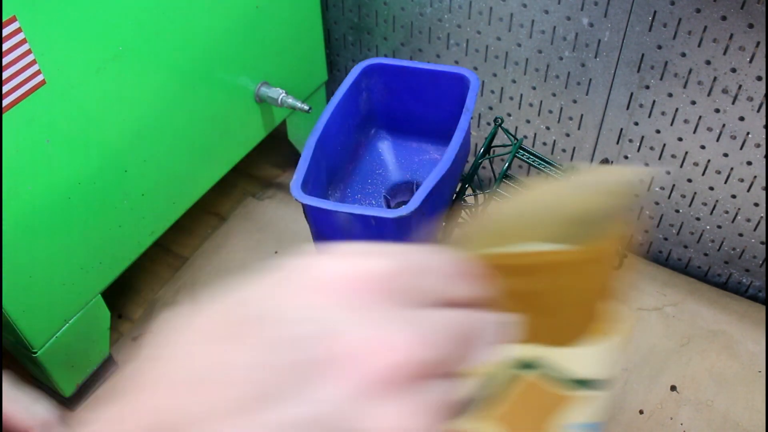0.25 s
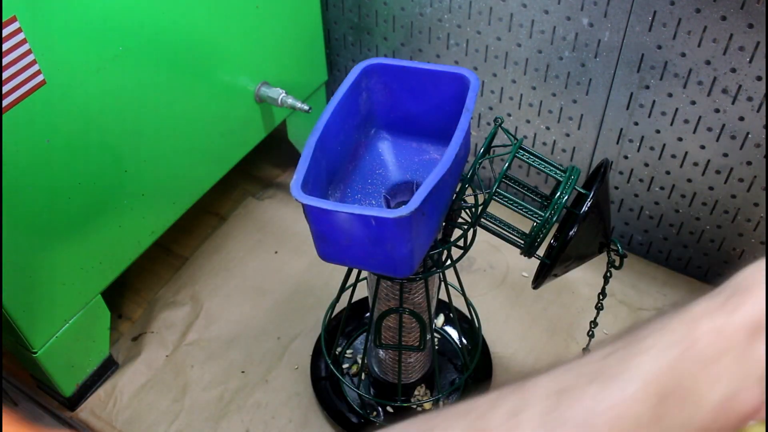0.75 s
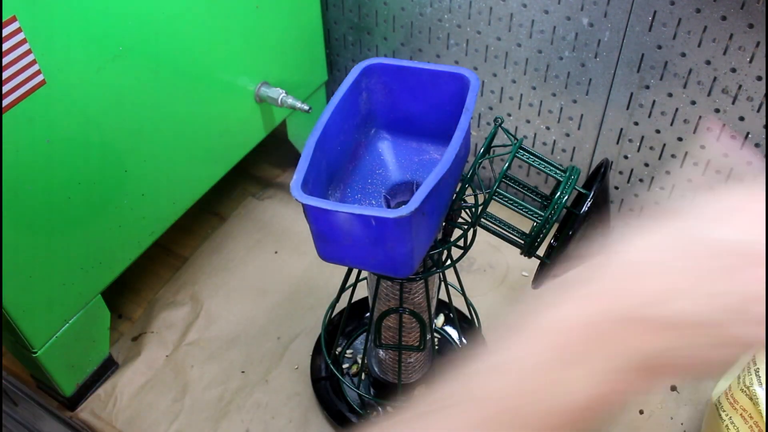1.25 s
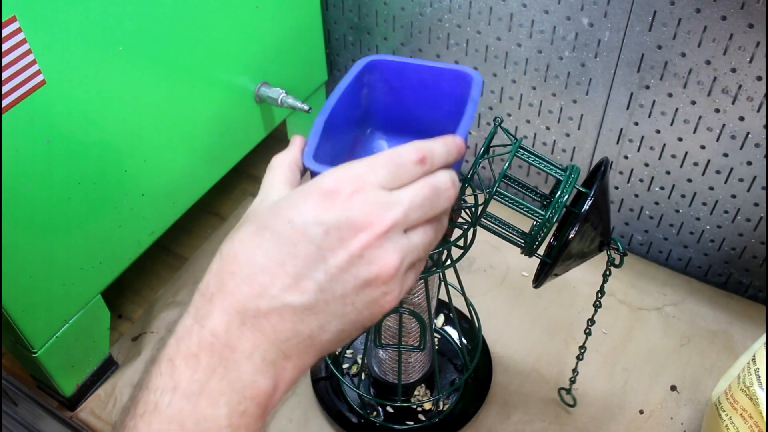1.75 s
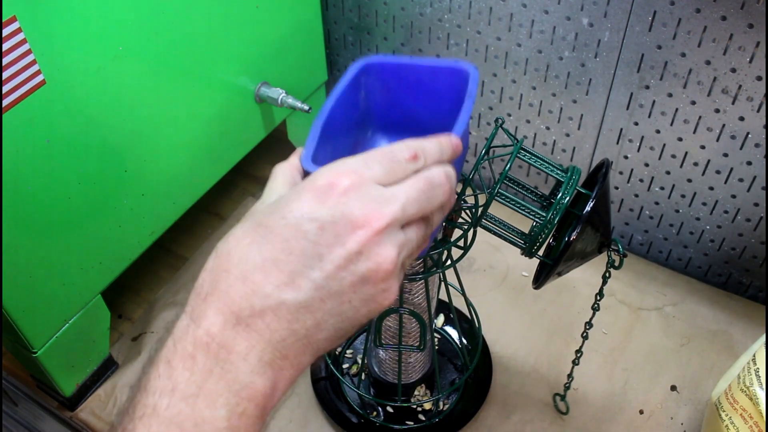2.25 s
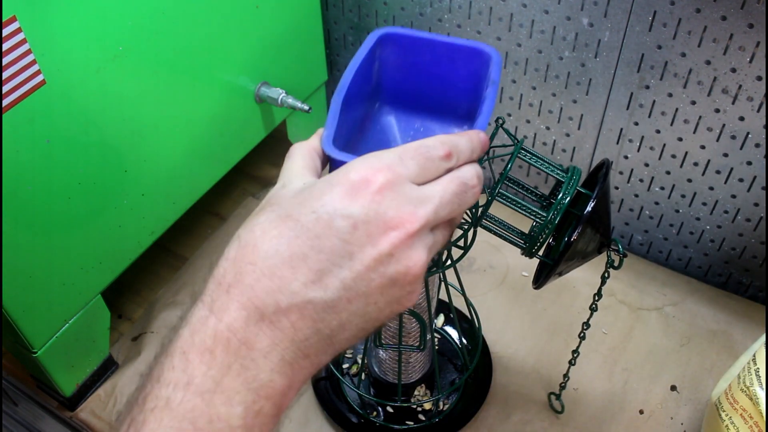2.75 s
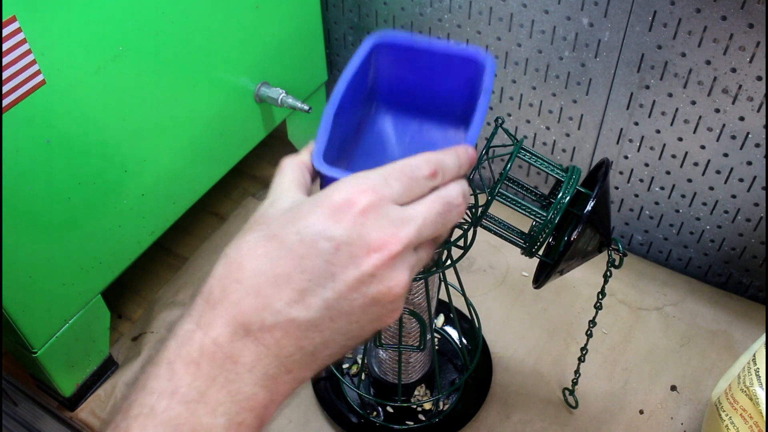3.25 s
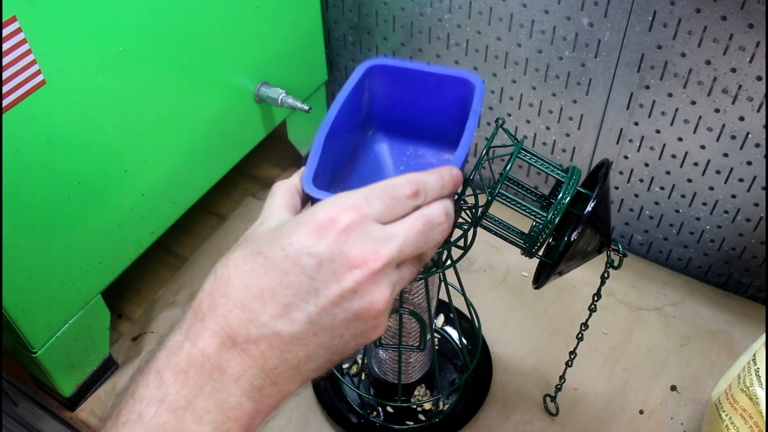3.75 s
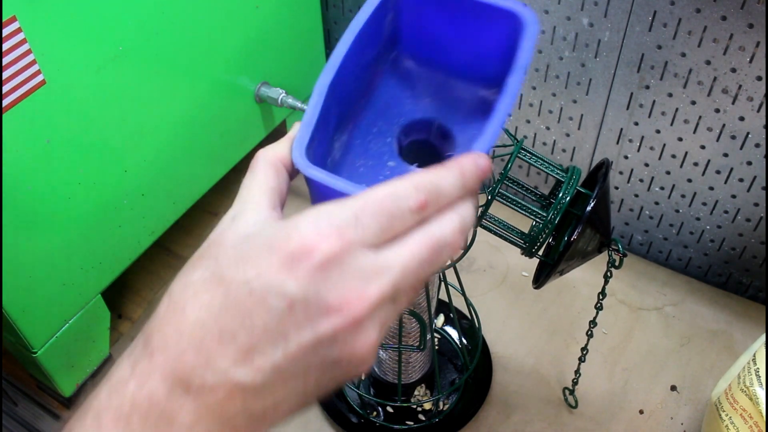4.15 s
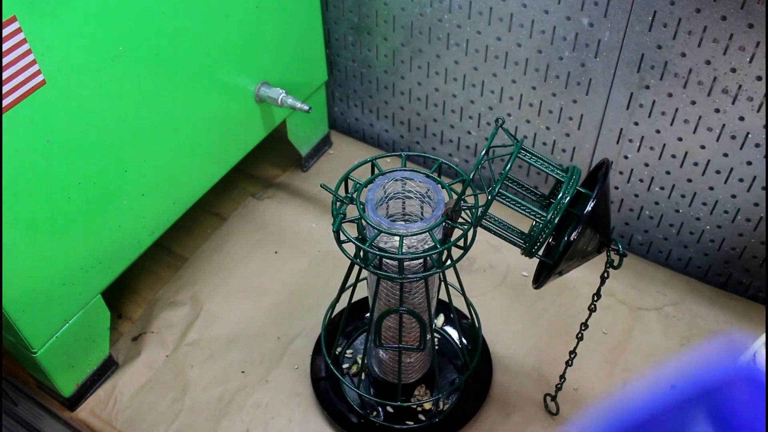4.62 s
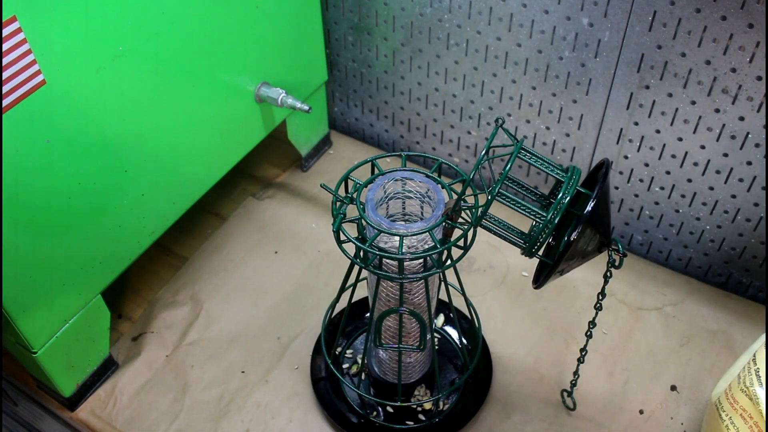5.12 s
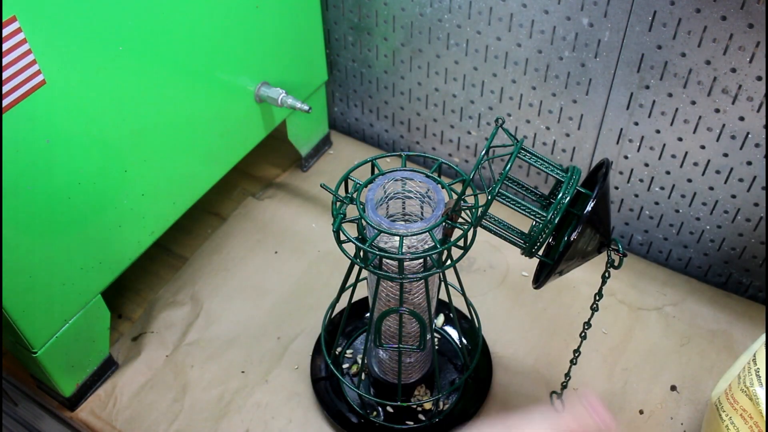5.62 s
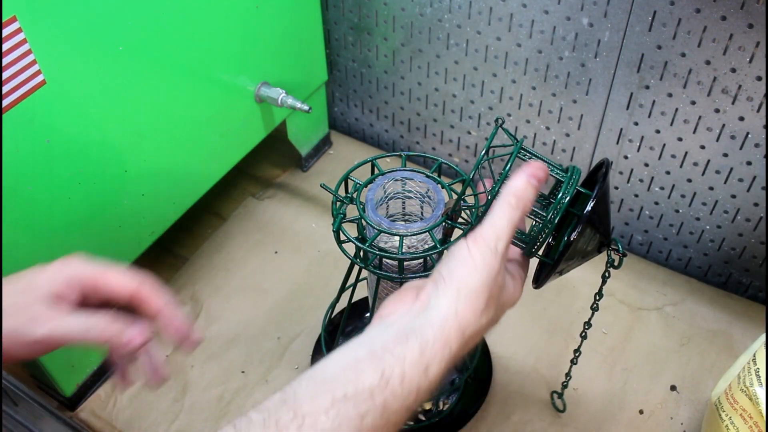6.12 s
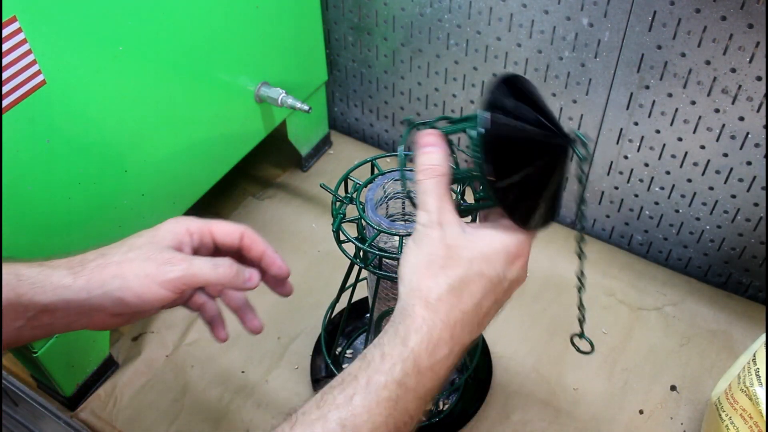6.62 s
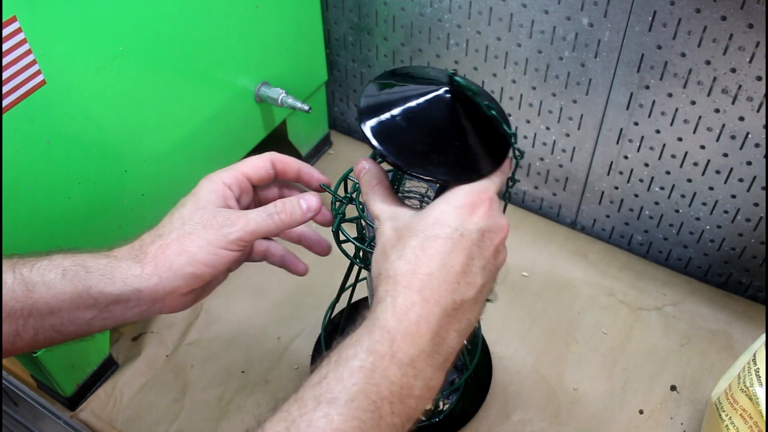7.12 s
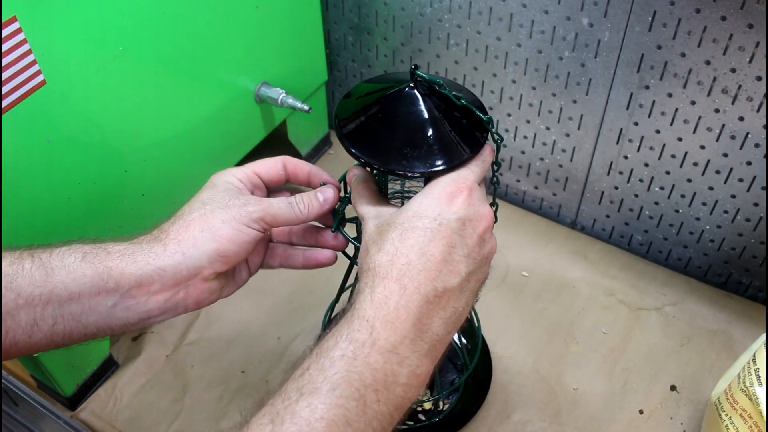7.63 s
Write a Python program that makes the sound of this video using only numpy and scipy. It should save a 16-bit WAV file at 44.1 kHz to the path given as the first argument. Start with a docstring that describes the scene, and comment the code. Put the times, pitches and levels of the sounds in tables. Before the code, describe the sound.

A soft low ventilation hum runs throughout a small workshop with short, dry reflections, heard through one close, slightly dull microphone. From 0 to 0.4 s a stiff seed bag crackles, with several bright snaps and a grainy crunch; light pats and faint wire ticks follow until 0.7. At 1.1 the bag lands with a crunchy thump, rustling and snapping until about 1.6. From 1.9 to 2.8 a hollow plastic funnel knocks rapidly and unevenly in the feeder's neck, while the last seeds rasp in jerky spurts and the base thumps the bench. A strong single knock comes at 3.1, then a looser group at 3.6-3.9 with short seed rasps. Near 5.2-5.35 the funnel bounces, scrapes and clacks hard on the bench. Quiet hum follows. At 6.7 and 6.9 chain and wire cage clink sharply; a faint touch at 7.05 and a small tick at 7.6 finish.

```python
"""A bag of birdseed crinkles in a low-humming workshop and is set down: film buckles into grains and ringing facets.
A plastic funnel is jiggled in the neck of a tube feeder: its damped modes knock, the feeder's base thumps on
the bench, and the last seeds rasp down the spout by stick-slip flow. The funnel is dropped aside, with
impacts and friction as filtered noise; then the lid is lifted on with a clink of its chain, as ringing modes.
One dull microphone hears it all."""
import sys
import numpy as np
from scipy import signal
from scipy.fft import rfft, irfft
from scipy.io import wavfile
from scipy.ndimage import uniform_filter1d

SR = 44100
rng = np.random.default_rng(int(sys.argv[2]) if len(sys.argv) > 2 else 0)


def transcribe(u):
    """Save the signal u as a 16-bit wav file named by the first command-line argument.

    u: samples, shape (n,) or (channels, n), limited to [-1, 1]; the rate is SR.
    q: integer samples, one column per channel.
    """
    v = np.clip(np.atleast_2d(u).T, -1, 1)
    q = np.round(v * 32767).astype(np.int16)
    wavfile.write(sys.argv[1], SR, q)


N = 347490
T = np.arange(N) / SR
HIT = T[:SR // 3]  # time axis of one blow


def amp(db):
    """Logarithmic level: decibels to gain."""
    return 10 ** (np.asarray(db) / 20)


def unit(x):
    """Power normalization: scale to rms 1."""
    return x / np.sqrt(np.mean(x ** 2) + 1e-20)


def peak(x, db):
    """Short-time level: scale a blow so that twice the rms of its strongest 3 ms has the given level."""
    strongest_power = uniform_filter1d(x ** 2, size=132).max()
    return x * amp(db) / np.sqrt(4 * strongest_power)


def add(out, s, x):
    """Superposition: mix a sound in at time s."""
    i = max(int(s * SR), 0)
    out[i:i + len(x)] += x[:N - i]


def curve(rows):
    """Amplitude envelope: smoothed gain through (t/s, level/dB) rows, at -120 dB outside them."""
    s, db = np.transpose(rows)
    gain = amp(np.interp(T, s, db, left=-120, right=-120))
    return uniform_filter1d(gain, size=400)


def colour(x, points):
    """Minimum-phase filtering: a causal response with the given (f/Hz, level/dB) spectrum."""
    size = 8192
    hz, db = np.transpose(points)
    gain_db = np.interp(np.log(np.fft.rfftfreq(size, 1 / SR) + 1), np.log(hz), db)
    cepstrum = irfft(np.log(amp(gain_db)))
    # folding the cepstrum on to positive times makes the response causal
    cepstrum[1:size // 2] *= 2
    cepstrum[size // 2 + 1:] = 0
    response = irfft(np.exp(rfft(cepstrum)))
    return signal.fftconvolve(x, response)[:len(x)]


def band(x, hz, width):
    """Second-order resonance: one broad peak, gain 1 at its centre."""
    g = np.tan(np.pi * min(hz, SR / 3) / SR)
    k = width / hz
    feedback = [1 + g * k + g * g, 2 * g * g - 2, 1 - g * k + g * g]
    return signal.lfilter([g * k, 0, -g * k], feedback, x)


def fade(t60):
    """Exponential damping: a blow falls 60 dB in t60 seconds."""
    return np.exp(-np.log(1000) * HIT / max(t60, 1e-3))


def crack(t60):
    """High modal density: a cluster of short-lived modes, as decaying noise."""
    return rng.standard_normal(len(HIT)) * fade(t60)


def ring(modes, detune):
    """Modal superposition: damped modes start together; grip and contact point shift them on each blow."""
    out = np.zeros(len(HIT))
    shifts = 1 + detune * rng.standard_normal(len(modes))
    for (hz, db, t60), shift in zip(modes, shifts):
        out += amp(db) * fade(t60) * np.sin(2 * np.pi * hz * shift * HIT)
    return out


def grains(count, rate, spread_db):
    """Shot noise: tiny impacts at random moments, rate per second, with scattered sizes."""
    present = rng.random(count) < rate / SR
    sizes = amp(spread_db * np.clip(rng.standard_normal(count), -2, 2))
    signs = rng.choice([-1, 1], count)
    return unit(present * sizes * signs)


def spurt(length, db, hz, spectrum, rate, spread_db, breadth, release_s):
    """Gated shot noise: a short rush of grains that stops with a quick tail."""
    onset = np.minimum(HIT / 0.00053, 1)
    release = np.exp(-np.maximum(HIT - length, 0) / release_s)
    rush = colour(grains(len(HIT), rate, spread_db) * onset * release, spectrum)
    x = band(rush, hz, breadth * hz)
    rms = np.sqrt(np.sum(x ** 2) / (SR * (length + release_s / 2)))
    return x * amp(db) / rms


def moments(start_s, end_s, count):
    """Stratified chance: one uneven time falls somewhere in each equal share of a span."""
    return start_s + (end_s - start_s) * (np.arange(count) + rng.random(count)) / count


# ventilation spectrum: f/Hz, relative spectral level/dB
AIR_SPECTRUM = [(25, -11), (45, -6), (62, -3), (90, -7), (120, -5), (148, -0.5), (185, -8.5), (320, -11.5),
                (420, -13), (800, -18.5), (2000, -24.5), (4600, -28), (7000, -31), (8000, -48.5)]
# steady hum components: f/Hz, rms level/dB
HUM_TONES = [(60, -58.5), (146, -58), (328, -66)]


def background():
    """Stationary noise and tones: soft ventilation, and a hum made to waver by narrow-band noise."""
    out = unit(colour(rng.standard_normal(N), AIR_SPECTRUM)) * amp(-51.5)
    for hz, db in HUM_TONES:
        tone = np.sqrt(2) * np.sin(2 * np.pi * hz * T)
        waver = 0.26 * unit(band(rng.standard_normal(N), hz, 2.7))
        out += amp(db) * unit(tone + waver)
    return out


# early reflections, tail and low tail:
# level/dB against the direct sound, delay/s, t60/s, centre f/Hz, width/Hz
REFLECTIONS = [(-10, 0.00125, 0.035, 2730, 15000), (-18.5, 0.01, 0.24, 480, 18000),
               (-26, 0.0055, 0.37, 99, 300)]


def workshop(x):
    """Reverberation by convolution: quick reflections from bench and pegboard, then a short tail."""
    response = np.zeros(len(HIT))
    for db, delay, t60, hz, width_hz in REFLECTIONS:
        echoes = band(crack(t60) * (HIT > delay), hz, width_hz)
        response += amp(db) * echoes / np.linalg.norm(echoes)
    return x + signal.fftconvolve(x, response)[:N]


def facet(hz, t60, count):
    """Buckling shell: a patch of film rings with a few chance modes around its centre pitch."""
    draws = rng.standard_normal((count, 2))
    octaves = np.linspace(-1.1, 1.3, count) + 0.048 * draws[:, 0]
    pitches = np.minimum(hz * 2 ** octaves, SR / 3)
    modes = [(f, 3 * size, t60) for f, size in zip(pitches, draws[:, 1])]
    return ring(modes, detune=0) / np.sqrt(count / 2)


SNAP_RING_S = 0.036


def snap(db, hz):
    """Sudden buckling: ringing facet and dense crack of one crease, through two resonances."""
    film = amp(-10.5) * facet(hz, 2.85 * SNAP_RING_S, count=14)
    film += crack(SNAP_RING_S) + amp(16.5) * crack(0.021)
    return peak(band(band(film, hz, 0.73 * hz), hz, 3.5 * hz), db - 4.0)


def pat(db, hz, t60):
    """Heavily damped impact: one dull pat of the bag's body."""
    return peak(band(band(crack(t60), hz, 0.44 * hz), hz, 3.3 * hz), db)


# lighter pats come by chance while the bag is carried
CARRY_START_S, CARRY_END_S = 0.18, 0.72
LIGHT_PAT_DB, LIGHT_PAT_FALL_DB_PER_S = -33.5, 4
LIGHT_PAT_HZ, LIGHT_PAT_OCTAVES, LIGHT_PAT_RING_S = 1050, 0.69, 0.027

# spectrum of the film's crackle: f/Hz, relative spectral level/dB
FILM_SPECTRUM = [(100, -24), (200, -12), (400, -12.5), (700, -9), (1000, -5), (1600, -5.5), (2700, -6.5),
                 (4000, -11), (6000, -11), (7500, -22.5), (9000, -24)]
# two stretches of rustle, each with columns: t/s, relative level/dB
RUSTLE_STRETCHES = [
    [(0.0, -24.5), (0.038, -33), (0.33, -50), (0.486, -55), (0.75, -58.5)],
    [(1.0, -58), (1.088, -45), (1.135, -33), (1.23, -29.5), (1.288, -36.5), (1.416, -57), (1.5, -57.5)],
]
# snapping creases: t/s, relative peak level/dB, centre f/Hz
CREASE_SNAPS = [(0.025, -23, 2060), (0.098, -7.5, 2620), (0.125, -5, 2200), (0.173, -13.5, 1520),
                (0.194, -7, 1955), (0.322, -3, 2884), (1.301, -3, 2090), (1.392, -8, 2440),
                (1.611, -25, 2030)]
# the bag is gripped, then lands: t/s, length/s, rms level/dB, centre f/Hz
GRIP_AND_LANDING = [(0.112, 0.096, -32, 1500), (1.097, 0.029, -16, 1550)]
# heaviest pats of the sagging body: t/s, peak level/dB, centre f/Hz, t60/s
HEAVY_PATS = [(0.111, -22, 630, 0.2), (0.125, -22.5, 85, 0.19), (.142, -24.5, 342, 0.039),
              (1.100, -9, 1200, 0.032), (1.102, -25, 189, 0.06), (1.169, -21.5, 487, 0.079)]


def bag():
    """Crackling noise: stiff film crackles and snaps, and the seed inside crunches and sags."""
    crackle = unit(colour(grains(N, rate=2400, spread_db=7), FILM_SPECTRUM))
    out = crackle * sum(curve(rows) for rows in RUSTLE_STRETCHES) * amp(-1.0)
    for s, db, hz in CREASE_SNAPS:
        add(out, s, snap(db, hz))
    for s, length, db, hz in GRIP_AND_LANDING:
        crunch = spurt(length, db, hz, FILM_SPECTRUM, rate=6000, spread_db=2.0, breadth=7.4,
                       release_s=0.0092)
        add(out, s, crunch)
    for s, db, hz, t60 in HEAVY_PATS:
        add(out, s, pat(db, hz, t60))
    for s in moments(CARRY_START_S, CARRY_END_S, count=7):
        hz = LIGHT_PAT_HZ * 2 ** (LIGHT_PAT_OCTAVES * rng.standard_normal())
        db = LIGHT_PAT_DB - LIGHT_PAT_FALL_DB_PER_S * (s - CARRY_START_S)
        add(out, s, pat(db, hz, LIGHT_PAT_RING_S))
    return out


# modes of the lid's chain: f/Hz, relative level/dB, t60/s
CHAIN_MODES = [(1470, -18, .14), (4200, -6, .08), (4665, 0, .09), (4780, -6, .06), (5250, -3, .02),
               (5610, -4, .04), (6050, -3, .025), (6900, -11, .04)]
# modes of the wire cage: f/Hz, relative level/dB, t60/s
CAGE_MODES = [(1400, -3, .035), (1735, 3, .075), (1850, 1, .035), (2342, -3, .04), (3230, -2, .085),
              (3467, -7, .06), (4360, -9, .04), (4657, -7, .04), (5170, -5, .03), (5640, 4, .04),
              (6530, -3, .035), (7950, -4, .04)]
# bag, chain and lid touching the cage: t/s, chain peak level/dB and cage peak level/dB before the buzz,
# tick peak level/dB, tick centre f/Hz, tick width/Hz
CAGE_TOUCHES = [(.568, -62, -33.5, -54, 4940, 3020), (0.6314, -56, -34.5, -21, 2660, 790),
                (6.6741, -21, -44, -13, 5290, 1700), (6.875, -49, -22.5, -14.5, 5700, 3900),
                (7.056, -71.5, -57, -45.5, 1610, 800), (7.566, -37.5, -34, -28.5, 1350, 2960)]


def lid():
    """Modal ringing under amplitude modulation: touches tick on the cage; cage and chain ring and buzz."""
    out = np.zeros(N)
    for s, chain_db, cage_db, tick_db, hz, width_hz in CAGE_TOUCHES:
        chain = peak(ring(CHAIN_MODES, detune=0.0021), chain_db)
        cage = peak(ring(CAGE_MODES, detune=0.0041), cage_db)
        buzz = 1 + 0.47 * unit(band(rng.standard_normal(len(HIT)), 150, 400))
        add(out, s, (chain + cage) * buzz)
        tick = band(band(crack(0.024), hz, width_hz), hz, width_hz)
        add(out, s, peak(tick, tick_db))
    return out


# spectrum of plastic against the bench: f/Hz, relative spectral level/dB
BENCH_SPECTRUM = [(120, -17), (300, -25.5), (480, -3), (680, -8.5), (790, -9), (970, -13), (1400, -9.5),
                  (2050, -12), (2900, -6.5), (4000, -13), (6800, -15.5), (8800, -30.5)]


def bench_hit(db, hz, width_hz, t60):
    """Impact noise: plastic meets the wooden bench."""
    blow = crack(t60) + amp(-1) * crack(0.003)
    return peak(band(colour(blow, BENCH_SPECTRUM), hz, width_hz), db)


SCRAPE_HZ, SCRAPE_WIDTH_HZ = 840, 170
RIM_TICK_HZ, RIM_TICK_WIDTH_HZ = 3900, 3400
BODY_RING_S, BODY_BREADTH = 0.048, 0.63  # breadth: bandwidth over centre frequency
# the bench answers each bounce with a low thud, level against the body's
BENCH_THUD_DB, BENCH_THUD_HZ, BENCH_THUD_RING_S = -15.5, 220, 0.13

# the funnel sliding and settling: t/s, relative level/dB
SLIDE_LEVEL = [(5.15, -57), (5.198, -52.5), (5.322, -33), (5.438, -57), (5.5, -67)]
# the rim scrapes ever harder as it slides: t/s, level/dB
SCRAPE_LEVEL = [(5.165, -49.5), (5.33, -39)]
# bounces, rim first and then body:
# t/s, rim peak level/dB, rim t60/s, body lag/s, body peak level/dB, body f/Hz
BOUNCES = [(5.160, -34.5, 0.062, 0.0011, -30, 550), (5.255, -19, 0.1, 0.0012, -18.5, 685),
           (5.284, -9, 0.019, 0.0017, -6.5, 860), (5.336, 0, .015, 0.0073, -6.5, 1330)]


def set_down():
    """Friction and impact noise: the free funnel bounces, slides with a swelling scrape, and settles."""
    friction = colour(grains(N, rate=2900, spread_db=5), BENCH_SPECTRUM)
    out = unit(friction) * curve(SLIDE_LEVEL) * amp(-3.0)
    out += unit(band(friction, SCRAPE_HZ, SCRAPE_WIDTH_HZ)) * curve(SCRAPE_LEVEL)
    for s, rim_db, rim_t60, lag, body_db, body_hz in BOUNCES:
        rim = bench_hit(rim_db, RIM_TICK_HZ, RIM_TICK_WIDTH_HZ, rim_t60)
        body = bench_hit(body_db, body_hz, BODY_BREADTH * body_hz, BODY_RING_S)
        thud = bench_hit(body_db + BENCH_THUD_DB, BENCH_THUD_HZ, BODY_BREADTH * BENCH_THUD_HZ,
                         BENCH_THUD_RING_S)
        add(out, s, rim)
        add(out, s + lag, body)
        add(out, s + lag, thud)
    return out


SLIP_HZ, SLIP_JITTER, SLIP_SAG_DB = 29, 0.3, 22  # slips per second, log unevenness, sag before the next


def slips():
    """Stick-slip relaxation: seed jams and lets go unevenly; each slip starts at once and sags."""
    pace = SLIP_HZ * np.exp(SLIP_JITTER * unit(band(rng.standard_normal(N), 13, 24)))
    phase = np.cumsum(pace) / SR % 1
    return unit(amp(-SLIP_SAG_DB * phase))


RASP_HZ, RASP_WIDTH_HZ = 5050, 18000
# stragglers tick down the tube: level against the rasp, time constant of dying away
TRICKLE_DB, TRICKLE_S = -13.5, 0.048

# spectrum of seed in the spout: f/Hz, relative spectral level/dB
SEED_SPECTRUM = [(300, -27.5), (500, 0.5), (900, 6.5), (1100, -8.5), (1350, -19), (1600, -1), (1900, -12),
                 (2300, -5.5), (3100, -1.5), (4300, -5.5), (5200, -0.5), (6500, -5.5), (7700, -12.5),
                 (9000, -16)]
# flow swelling and running out while the funnel is jiggled: t/s, relative level/dB
SEED_FLOW = [(1.88, -65), (1.95, -43.5), (2.07, -26), (2.17, -43.5), (2.31, -33), (2.52, -49.5),
             (2.68, -48), (2.85, -63.5)]
# strongest rasps of seed and spout in the neck: t/s, length/s, rms level/dB
STRONG_RASPS = [(1.778, 0.04, -44.5), (2.013, 0.012, -29), (2.118, 0.028, -21), (2.155, 0.018, -19.5),
                (2.254, 0.031, -29), (2.413, 0.00089, -47), (2.429, 0.0014, -25.5), (2.466, 0.02, -33.5),
                (2.583, 0.026, -30), (2.738, 0.011, -34.5), (3.326, 0.023, -38.5), (3.7722, 0.013, -22),
                (3.898, 0.02, -32.5)]


def seeds():
    """Granular flow: seed rasps down the spout in slips, and a thin trickle of separate ticks follows."""
    rush = colour(grains(N, rate=3800, spread_db=9.5) * slips(), SEED_SPECTRUM)
    rasp = unit(band(rush, RASP_HZ, RASP_WIDTH_HZ)) * curve(SEED_FLOW) * amp(0.5)
    for s, length, db in STRONG_RASPS:
        burst = spurt(length, db, RASP_HZ, SEED_SPECTRUM, rate=5200, spread_db=11.0,
                      breadth=RASP_WIDTH_HZ / RASP_HZ, release_s=0.0023)
        add(rasp, s, burst)
    # the trickle follows the rasp's running power
    keep = np.exp(-1 / (TRICKLE_S * SR))
    falling = np.sqrt(signal.lfilter([1 - keep], [1, -keep], rasp ** 2))
    ticks = unit(colour(grains(N, rate=320, spread_db=-1), SEED_SPECTRUM))
    return rasp + ticks * falling * amp(TRICKLE_DB)


# modes of the feeder's base on the bench: f/Hz, relative level/dB, t60/s
BASE_MODES = [(143, 0, .09), (170, -5, .045), (235, -4, .025), (310, -5, .025), (400, -8, .02)]


def base_thud():
    """Inefficient low-frequency radiation: base and bench ring; so small a body radiates little deep bass."""
    thud = peak(ring(BASE_MODES, detune=0.03), 0)
    thud += peak(band(crack(0.044), 300, 430), -12.0)
    bass_cut = signal.butter(4, 108, "high", fs=SR, output="sos")
    return signal.sosfilt(bass_cut, thud)


# the base thumping on the bench: t/s, relative peak level/dB
BASE_THUMPS = [(2.002, -12), (2.145, -10), (2.263, -18.5), (2.602, -10), (3.917, -19), (7.569, -31.5)]


def feeder():
    """Damped impact: the loaded feeder rocks back on to the bench with a short, dry thump."""
    out = np.zeros(N)
    for s, db in BASE_THUMPS:
        add(out, s, peak(base_thud(), db + 1))
    return out


# funnel modes by region, each with columns: f/Hz, relative level/dB, t60/s
WALL_MODES = [(459, 10, 0.039), (522, 6.5, 0.03)]
RIM_MODES = [(874, 3, 0.032), (944, -14, 0.048), (1063, -20, 0.051)]
SHELL_MODES = [(610, -10.5, 0.02), (650, -11, 0.026), (1640, -25.5, 0.028), (2370, -4, 0.065),
               (2380, -24.5, 0.19), (2850, 2.5, 0.015), (2880, -8, 0.012), (3646, 6, 0.017),
               (4970, 0.5, 0.03)]
# radiation of the hollow funnel, with dark gaps between mode groups: f/Hz, relative level/dB
FUNNEL_RADIATION = [(150, -16.5), (330, -27), (430, -1.5), (690, 9), (780, -10.5), (865, 2.5), (1120, 3),
                    (1320, -10), (1560, 10), (1860, -9.5), (2300, 2), (3600, -7.5), (6000, 0.5),
                    (9000, -19)]


def knock(db, hard_hz, wall_db, rim_db):
    """Modal excitation: contact point favours wall or rim, and harder contact reaches higher modes."""
    body = amp(wall_db) * ring(WALL_MODES, detune=0.008)
    body += amp(rim_db) * ring(RIM_MODES, detune=0.016)
    body += ring(SHELL_MODES, detune=0.039)
    body += amp(-1) * crack(0.025)
    contact = signal.butter(1, min(hard_hz, SR / 3), fs=SR)
    radiated = colour(signal.lfilter(*contact, body), FUNNEL_RADIATION)
    # some of the blow travels down the tube to the base
    return peak(radiated, db) + peak(base_thud(), db - 20.0)


# every knock rebounds once, sooner or later with the grip: mean flight, relative scatter, level change
REBOUND_S, REBOUND_SCATTER, REBOUND_DB = 0.025, 0.203, -17.5
# between the knocks the jiggled funnel chatters lightly
CHATTER_START_S, CHATTER_END_S = 2.08, 2.68
CHATTER_DB, CHATTER_FALL_DB_PER_S = -28.5, 5.5

# knocks in the feeder's neck: t/s, peak level/dB, contact cutoff f/Hz (hardness),
# wall modes' gain level/dB, rim modes' gain level/dB
NECK_KNOCKS = [(1.939, -22, 900, 2, 9), (1.970, -9, 1100, 8, 8.5), (2.004, -11.5, 1700, -1, -0.5),
               (2.061, -11.5, 1210, -23, -3), (2.100, -9.5, 2500, -15, -5), (2.219, -15.5, 900, -32, 2.5),
               (2.548, -21.5, 2230, -8, -5.5), (2.600, -16, 1800, 10, -2), (2.713, -10, 800, 3.5, 6.5),
               (2.776, -23.5, 1200, -7.5, 1.5), (3.137, -4, 1930, -3.5, 1.5), (3.338, -25, 1000, -11.5, -2),
               (3.643, -12, 804, 11, 13), (3.653, -19, 1300, -4.5, 5.5), (3.755, -6, 1520, -1, 3),
               (3.912, -8, 755, -16, 12)]


def funnel():
    """Repeated impact: the funnel knocks and rebounds in the neck, and chatters ever more lightly."""
    out = np.zeros(N)
    for s, db, hard_hz, wall_db, rim_db in NECK_KNOCKS:
        add(out, s, knock(db, hard_hz, wall_db, rim_db))
        flight = REBOUND_S * (1 + REBOUND_SCATTER * rng.standard_normal())
        add(out, s + flight, knock(db + REBOUND_DB, hard_hz, wall_db, rim_db))
    for s in moments(CHATTER_START_S, CHATTER_END_S, count=8):
        db = CHATTER_DB - CHATTER_FALL_DB_PER_S * (s - CHATTER_START_S)
        add(out, s, knock(db, hard_hz=1300, wall_db=-2.5, rim_db=5.5))
    return out


def scene():
    """Linear superposition: all sources in the room, the same in both channels."""
    sources = bag() + lid() + set_down() + seeds() + feeder() + funnel()
    mono = workshop(sources) + background()
    return np.array([mono, mono])


TOP_HZ = 8200


def record(dry):
    """Saturation and band limiting: the recorder clips at full scale and passes little treble."""
    treble_cut = signal.butter(12, TOP_HZ, fs=SR, output="sos")
    return signal.sosfiltfilt(treble_cut, np.clip(dry, -1, 1))


dry = scene()
out = record(dry)
transcribe(out)
```